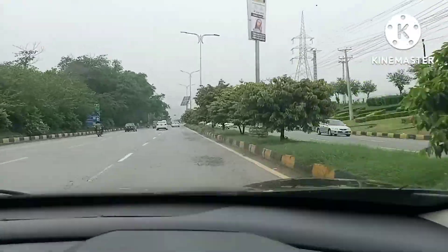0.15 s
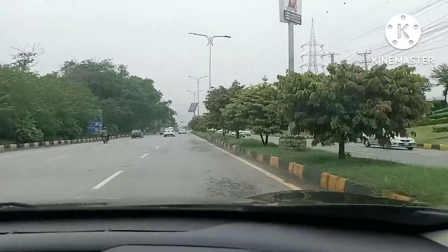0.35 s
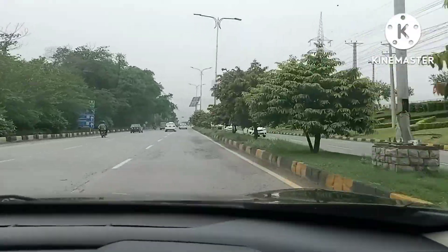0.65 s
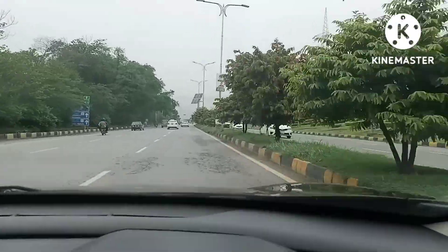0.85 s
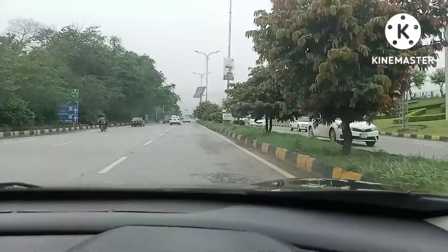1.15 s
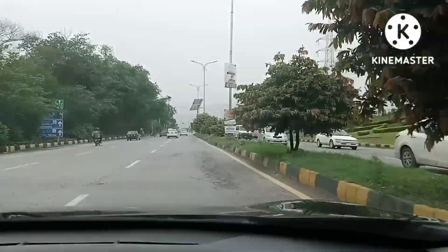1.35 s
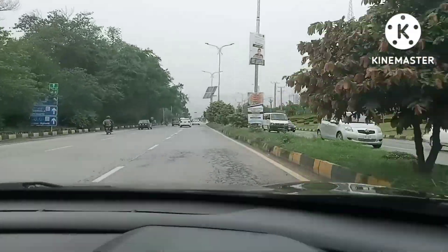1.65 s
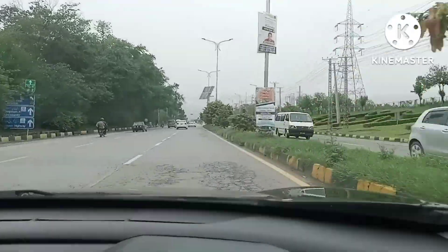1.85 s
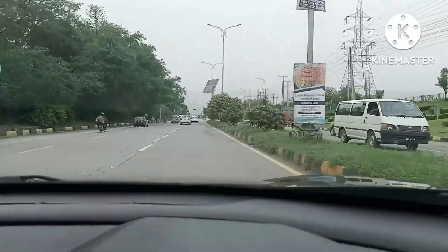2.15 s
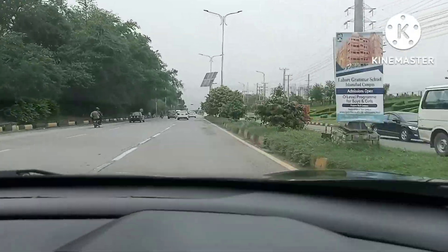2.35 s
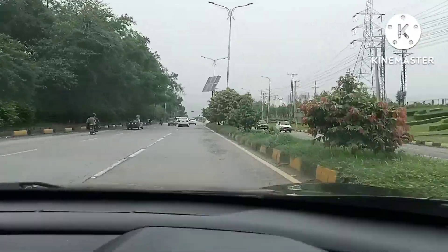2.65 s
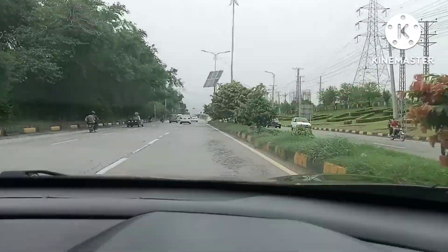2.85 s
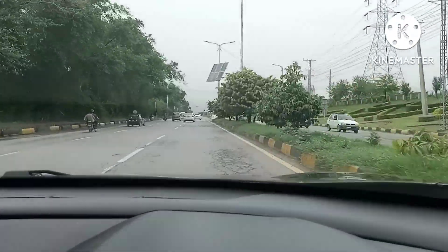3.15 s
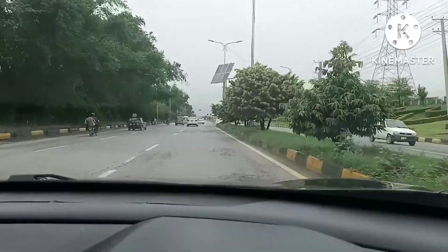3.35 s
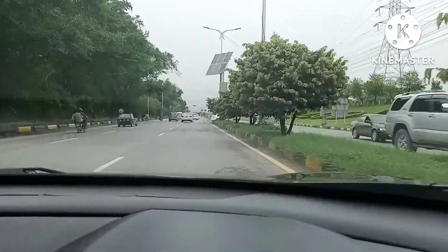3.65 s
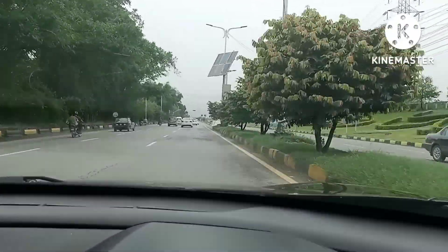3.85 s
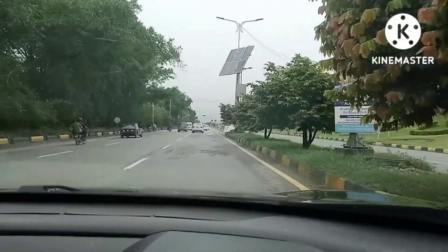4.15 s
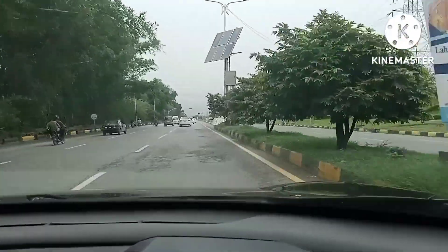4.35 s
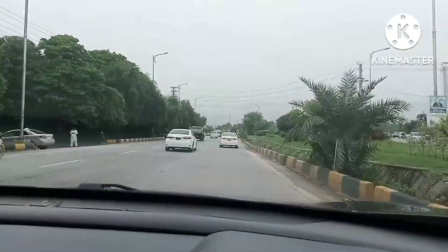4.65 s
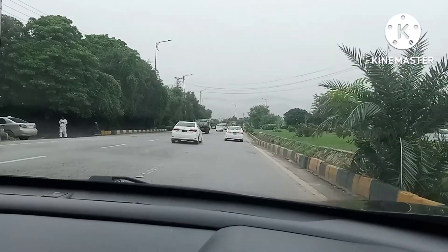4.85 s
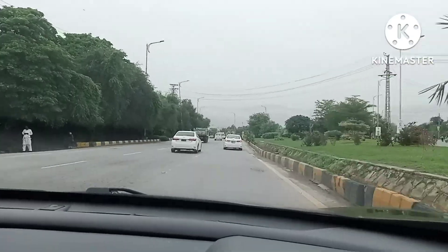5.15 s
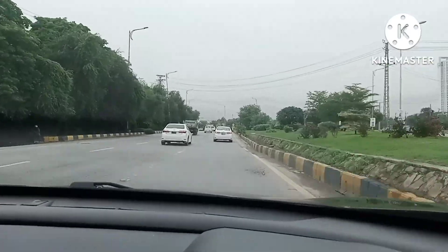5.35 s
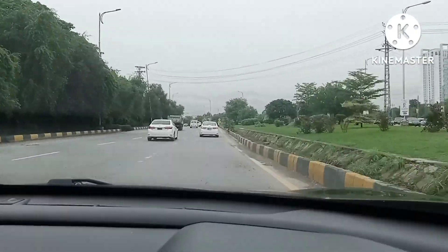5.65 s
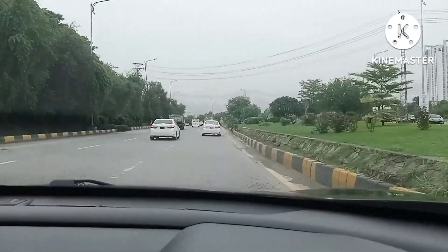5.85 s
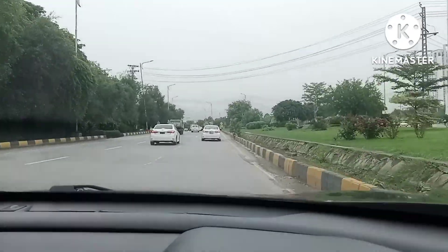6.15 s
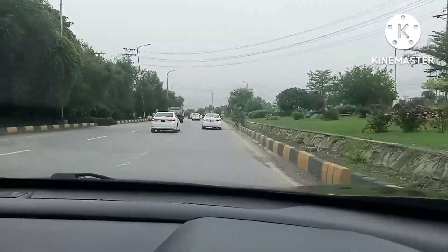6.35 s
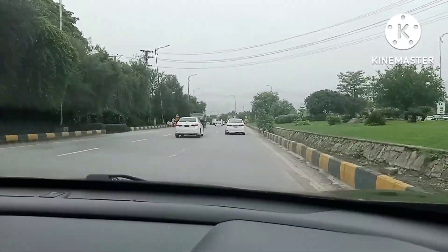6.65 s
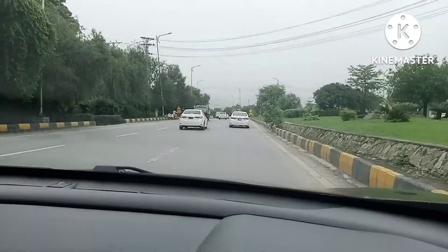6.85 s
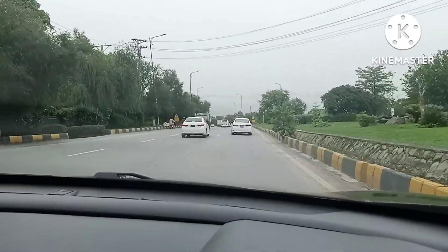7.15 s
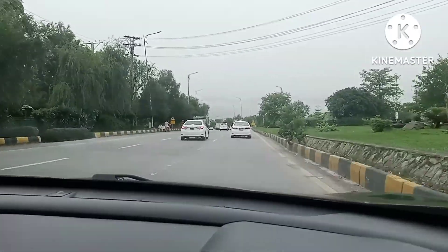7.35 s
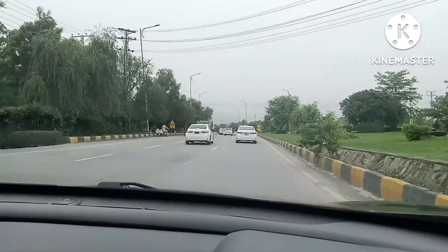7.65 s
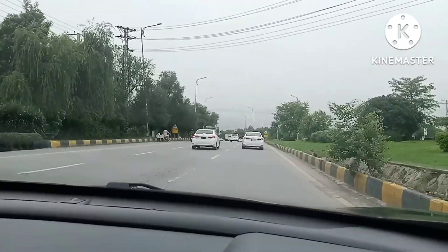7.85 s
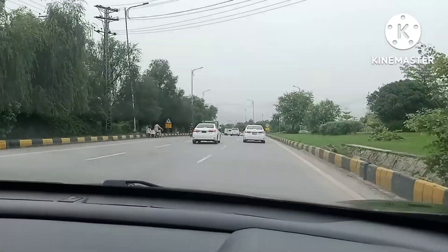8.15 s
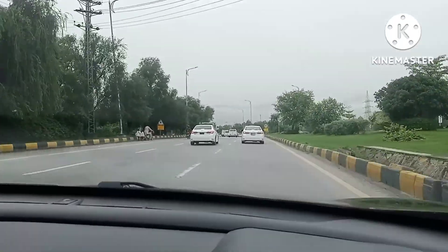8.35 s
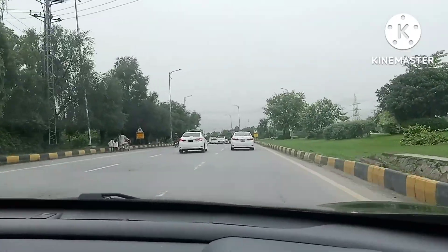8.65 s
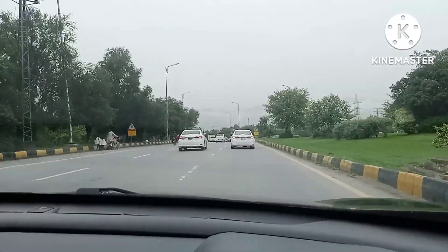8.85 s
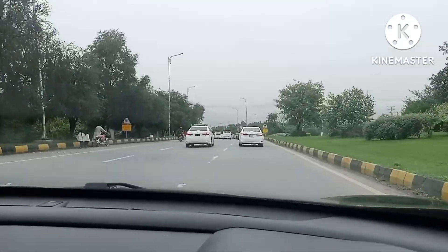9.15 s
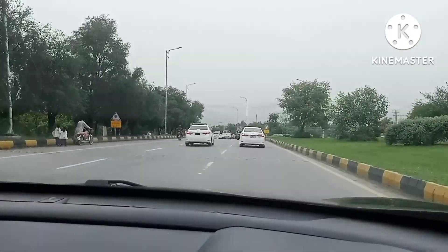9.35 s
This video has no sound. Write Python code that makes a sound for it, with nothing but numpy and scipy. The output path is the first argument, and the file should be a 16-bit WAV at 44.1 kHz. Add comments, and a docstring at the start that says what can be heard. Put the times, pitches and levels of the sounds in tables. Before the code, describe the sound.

Heavy booming cabin rumble on damp tarmac drops out suddenly midway, then swells back softer and steadier, with small clicks and a quiet knock.

```python
"""Inside a closed car

A drive on damp tarmac, heard by a hand-held phone: two stretches of road, with a fade, a cut and near silence between.
Shaken resonances make a low boom, and shaped noise makes the tyre roar and the hiss. Tiny contacts make loose trim buzz,
and sharp clicks, short blows and narrow noise make ticks, a knock and squeaks. A faint steady whine lies above."""
import sys
import numpy as np
from scipy import signal
from scipy.fft import rfft, irfft
from scipy.io import wavfile
from scipy.ndimage import uniform_filter1d

SR = 44100
rng = np.random.default_rng(int(sys.argv[2]) if len(sys.argv) > 2 else 0)


def pcm_store(signal):
    """Save signal as 16-bit PCM."""
    levels = np.round(np.clip(np.atleast_2d(signal), -1, 1) * 32767)
    wavfile.write(sys.argv[1], SR, levels.astype(np.int16).T)


N = 419832  # length in samples

# How hard the road shakes the car. Each row: time in seconds, boom level in dB.
ROAD_SHAKE = [(0.1, -31), (0.5, -29), (0.7, -29.5), (0.93, -24), (1.2, -32.5), (1.45, -23), (1.62, -20.5),
              (1.87, -28.5), (2.1, -21.5), (2.33, -20), (2.6, -25), (2.9, -30), (3.35, -28), (3.62, -24),
              (3.9, -25), (4.25, -26.5), (4.45, -27), (5.0, -31.5), (5.28, -32), (5.47, -30.5),
              (5.75, -32.5), (6.15, -28.5), (6.35, -30), (6.55, -30), (6.9, -33.5), (7.3, -31),
              (7.6, -32.5), (8.0, -34), (8.32, -29), (8.65, -34.5), (9.05, -33.5), (9.3, -33.5),
              (9.5, -33.5)]
# Body, cabin and tyre-cavity resonances, one table per stretch.
# Each row: pitch in Hz, width in Hz, average (rms) level in dB at the usual shake or upper level.
BODY_MODES = [
    [(52.3, 28, -50), (73.4, 7.6, -39.5), (84.8, 25, -38.5), (124.6, 27, -37), (169.9, 20, -37.5),
     (197.4, 24, -40.5), (237.5, 11, -44.5), (255.5, 17, -52), (303.4, 36, -43), (358, 47, -51)],
    [(30, 30, -59), (52, 15, -48.5), (76.6, 14, -40), (95, 25, -37), (128.2, 25, -34), (171.3, 21, -36.5),
     (205.4, 24, -44.5), (234.3, 26.4, -41), (308.5, 22.1, -41.5), (401, 110, -50)],
]
# Level of the upper boom resonances, one table per stretch. Each row: time in seconds, level in dB.
UPPER_BOOM = [
    [(0.2, -36), (0.55, -33.5), (1.24, -33.5), (1.58, -30.5), (1.93, -33.5), (2.27, -30.5), (2.62, -33),
     (3.31, -34.5), (3.66, -30), (3.85, -31.5), (4.1, -30.5), (4.4, -33)],
    [(5.0, -37), (6.6, -37), (7.4, -38), (7.8, -36), (8.2, -38.5), (8.6, -39.5), (9.0, -38), (9.4, -37.5)],
]
# Colour of the tyre roar after the panels, one table per stretch. Each row: pitch in Hz, relative dB per Hz.
ROAR_COLOUR = [
    [(300, -7), (400, -1.5), (570, -6.5), (750, -11.5), (900, -10.5), (1670, -13.5), (1900, -14),
     (2700, -27), (3000, -34), (3400, -43), (4600, -55.5)],
    [(300, -15.5), (400, 2.5), (540, -2), (650, -4.5), (730, -10.5), (860, -6.5), (1440, -11), (1900, -10),
     (2250, -16), (2960, -34.5), (4600, -47.5)],
]
# Door, floor and glass panels that shape the roar. Each row: pitch in Hz, width in Hz, lift in dB.
PANEL_LIFTS = [(567, 20, -1), (632, 40, 4), (811.6, 22, 4.5), (891.4, 13, 7), (1082, 79, 3), (1254, 13, 6),
               (1374, 16, 5.5), (1540, 22, 6), (1840, 31, 4), (3100, 40, 3)]
# Level of the roar's top edge, one table per stretch. Each row: time in seconds, level in dB.
ROAR_EDGE = [
    [(0.2, -64.5), (0.89, -72), (1.24, -64), (1.58, -74.5), (1.93, -67), (2.27, -76.5), (2.62, -66.5),
     (2.97, -64), (3.5, -70), (4.0, -66), (4.3, -65.5), (4.45, -67), (4.52, -56), (4.58, -58.5)],
    [(4.76, -68), (4.86, -75), (4.95, -75), (5.4, -71.5), (5.8, -75.5), (6.2, -76.5), (7.0, -73.5),
     (7.4, -75), (7.8, -71), (8.2, -75), (8.6, -75), (9.4, -75)],
]
# Colour of the microphone hiss. Each row: pitch in Hz, relative dB per Hz.
HISS_COLOUR = [(3500, -1), (4300, 0.5), (5500, 2), (6900, 1), (7500, -5), (8200, -11.5), (11000, -13.5),
               (14100, -14.5), (14300, -5.5), (15400, -3), (15700, -25.5), (16700, -26.5)]
# Resonances of the phone case and microphone port. Each row: pitch in Hz, width in Hz, strength in dB.
CASE_MODES = [(6700, 1200, -1.5), (10600, 4500, -17), (5100, 2200, -12.5)]
# Ticks on the case and the trim. Each row: start in seconds, peak in dB, pitch of its own ring in Hz,
# ring strength in dB, dull body strength in dB, bright top strength in dB.
TICK_EVENTS = [(0.0712, -23.5, 6840, 2, -24, -18), (.107, -59, 14500, -2, -8, -6),
               (.161, -71, 10500, 9, -21, -18), (.328, -68, 9000, 0, -21, -15),
               (2.798, -77, 14100, 7, -18, -5), (3.669, -61, 7830, 0, -21, -15),
               (4.465, -56, 6200, 0, -25, -4), (4.4707, -35, 5960, -3.5, -17, -7),
               (4.498, -26.5, 5800, 2, -37, -2), (4.5196, -44, 6500, -2, -30, -9),
               (4.805, -39.5, 7500, -3, -21, -3), (5.862, -66, 4700, 5, -3, -15),
               (5.866, -68, 7600, 6, -8, -15), (6.113, -64, 9300, -1, -2, -15),
               (6.118, -58, 7300, 1, -6, -15), (6.603, -57, 8260, -1, 0, -15),
               (6.620, -64, 7300, 4, -19, -15), (7.292, -56, 7100, 2, 0, -12),
               (7.294, -61, 10200, 4, -20, -11), (7.726, -57, 9200, 6, -3, -15),
               (7.859, -73, 8200, 2, -1, -5), (8.115, -68, 6300, -4, -2, -15),
               (8.691, -62, 8100, 9, -3, -8), (8.829, -62, 8500, 1, 1, -15), (8.831, -68, 6100, 6, -9, -15)]
# Short squeaks, likely trim rubbing. Each row: middle in seconds, half length in seconds, pitch in Hz,
# level in dB before the swell and fade.
SQUEAK_EVENTS = [(0.33, 0.032, 6240, -69.5), (0.84, 0.029, 6040, -83), (2.45, 0.046, 6700, -72),
                 (3.065, 0.19, 3610, -78.5), (4.555, .02, 6940, -74), (4.73, 0.016, 1800, -47),
                 (5.378, .025, 3870, -71), (6.09, .02, 6350, -80), (5.878, .02, 4320, -79),
                 (6.206, .04, 3700, -78), (6.74, .025, 3150, -79), (6.73, .04, 7000, -87),
                 (9.045, .05, 5350, -86), (9.084, 0.042, 6850, -79), (9.161, 0.046, 6800, -77)]
# A double knock and a fainter third blow. Each row: start in seconds, peak in dB.
KNOCK_BLOWS = [(6.664, -34), (6.670, -34), (6.678, -53)]
# Resonances of the dashboard. Each row: pitch in Hz, width in Hz, strength in dB.
DASH_MODES = [(1830, 280, 3.5), (1190, 500, -4), (2700, 290, -14), (3230, 210, -19), (4600, 610, -27),
              (5800, 1300, -31)]
# Level of the trim's buzz. Each row: time in seconds, level in dB.
BUZZ_LEVEL = [(0.2, -85), (0.55, -91.5), (0.9, -90), (1.58, -81.5), (1.93, -88), (2.3, -82.5),
              (2.62, -83.5), (2.97, -88), (4.0, -86.5), (4.35, -90.5), (4.48, -84), (4.55, -86.5),
              (4.82, -91), (5.4, -92), (5.8, -99.5), (6.2, -93), (7.1, -90.5), (7.4, -87.5), (7.8, -99),
              (8.6, -99), (9.4, -99)]

CHANGE_S = 4.65  # the second stretch's settings start here
USUAL_SHAKE_DB = -30
UPPER_FROM_HZ, USUAL_UPPER_DB = 150, (-34, -36)  # usual level per stretch
ROAR_DB, ROAR_PER_SHAKE = (-43.5, -45.5), 0.2  # level at usual shake per stretch; dB of roar per dB of shake
EASE_FROM_S, EASE_DB_PER_S = 9.1, 0.7  # the roar sinks a little towards the end
EDGE_HZ, USUAL_EDGE_DB = 2400, (-67.5, -72.5)  # usual level per stretch
HISS_DB, HISS_PATCH_DB = -84, 1.6
WHINE_HZ, WHINE_DB = 14300, -96  # peak level on the first stretch
SQUEAK_WIDTH, SQUEAK_WAVERS = 0.06, 10  # share of the pitch; wavers in a half length, so long squeaks are purer
RING_HZ, FAINT_RING_HZ, FAINT_BELOW_DB = 1110, 450, -52  # ring widths; faint ticks on the trim ring longer
TICK_BODY_HZ, TICK_BODY_WIDTH_HZ = 4200, 2200
TICK_TOP_HZ, TICK_TOP_WIDTH_HZ = 14700, 940
TICK_TAIL_S, TAIL_S_PER_DB = 0.06, 0.001  # time to fall 60 dB for a -31 dB tick; fainter ticks die sooner
TAIL_DB = -46  # tail strength of a -14.5 dB tick, before the resonances
FADE_OUT_S, FADE_OUT_LENGTH_S, FADE_OUT_POWER = 4.491, 0.17, 2.1  # cut off before it is through
CUT_S, AFTER_CUT_DB, AFTER_CUT_DB_PER_S = 4.5905, -30, 700  # the boom drops at the cut, then dies away
FADE_IN_S, FADE_IN_LENGTH_S, FADE_POWER = 4.672, 0.27, 2.2
TOP_HZ = 16700


def undb(db):
    """Turn dB into a plain multiplier."""
    return 10 ** (np.asarray(db) / 20)


def level(x, db):
    """Scale a sound to an average (rms) level in dB."""
    return x * undb(db) / np.sqrt(np.mean(x ** 2))


def curve(rows, column):
    """Draw a table column as straight lines in time, one value per sample."""
    rows = np.array(rows)
    return np.interp(np.arange(N) / SR, rows[:, 0], rows[:, column])


def walk(rate):
    """Wander at random: held values, new at this rate per second, smoothed twice; spread near 1."""
    hold = int(SR / rate)
    steps = np.repeat(rng.standard_normal(N // hold + 1), hold)
    smooth = uniform_filter1d(uniform_filter1d(steps, hold), hold)
    return 1.3 * smooth[:N]


def mode(x, hz, width_hz):
    """Ring one resonance, which passes its centre pitch unchanged and weakens the rest."""
    return signal.lfilter(*signal.iirpeak(hz, hz / width_hz, fs=SR), x)


def ring_through(x, modes):
    """Ring several resonances at once: their powers add, and the response never starts before its cause."""
    hz = np.arange(513) * SR / 1024
    power = sum((undb(db) / (1 + (2 * (hz - centre) / width) ** 2)) ** 2 for centre, width, db in modes)
    # folding the cepstrum moves all of the response after its cause
    cepstrum = irfft(0.5 * np.log(power))
    cepstrum[1:512] *= 2
    cepstrum[513:] = 0
    response = irfft(np.exp(rfft(cepstrum)))
    return signal.fftconvolve(x, response)[:len(x)]


def bands(spectrum, lifts, shared_db, own_db, patch_hz, patch_s):
    """Colour noise; narrow patches of it swell and fade on their own, most of all near 3 kHz."""
    hz, s, cells = signal.stft(rng.standard_normal(N + SR // 5), SR, nperseg=2048, noverlap=1536)
    points = np.array(spectrum)
    colour_db = np.interp(np.log(hz + 1), np.log(points[:, 0]), points[:, 1], -200, -200)
    colour_db += sum(db / (1 + (2 * (hz - centre) / width) ** 2) for centre, width, db in lifts)
    # random numbers smoothed over pitch and time make the patches
    patches = rng.standard_normal(cells.shape)
    for _ in range(2):
        patches = uniform_filter1d(patches, max(int(patch_hz / hz[1]), 1), axis=0)
        patches = uniform_filter1d(patches, max(int(patch_s / s[1]), 1), axis=1)
    depth_db = own_db * np.clip(hz / 2500, 0.3, 1.2) * np.clip(1 - (hz - 3300) / 2000, 0.6, 1)
    patches_db = depth_db[:, None] * patches / patches.std()
    cells = cells * undb(colour_db[:, None] + patches_db)
    noise = signal.istft(cells, SR, nperseg=2048, noverlap=1536)[1]
    noise = noise[SR // 10:SR // 10 + N]
    return level(noise * undb(shared_db), 0)


def microphone_hiss():
    """Coloured noise of the microphone, with small random swells."""
    return bands(HISS_COLOUR, [], 0.67 * walk(22), HISS_PATCH_DB, 300, 0.03) * undb(HISS_DB)


def whine(t, first):
    """Faint electronics hold one pure tone, weaker on the second stretch."""
    whine_db = WHINE_DB - 8 * ~first
    return undb(whine_db) * np.sin(2 * np.pi * WHINE_HZ * t)


def squeaks():
    """A narrow band of noise swells and fades at one pitch, likely trim rubbing."""
    out = np.zeros(N)
    for middle_s, half_s, hz, db in SQUEAK_EVENTS:
        width = min(SQUEAK_WIDTH * hz, SQUEAK_WAVERS / half_s)
        n = int(half_s * 2 * SR)
        thin = mode(mode(rng.standard_normal(n), hz, width), hz, width)
        start = int((middle_s - half_s) * SR)
        out[start:start + n] += level(thin, db) * np.hanning(n)
    return out


def knocks():
    """Short rough blows ring the resonances of the dashboard."""
    out, t = np.zeros(N), np.arange(SR // 10) / SR
    for s, db in KNOCK_BLOWS:
        blow = 1.6 * (t == 0) + rng.standard_normal(len(t)) * np.exp(-t / 0.0051)
        rung = 0
        for hz, width, strength_db in DASH_MODES:
            narrow = mode(blow, hz, width)
            steep = mode(mode(narrow, hz, 2 * width), hz, 2 * width)
            rung = rung + undb(strength_db) * steep
        start = int(s * SR)
        out[start:start + len(t)] += rung * undb(db) / np.max(np.abs(rung))
    return out


def ticks():
    """A sharp click rings the phone case and a ring, body and top of its own, with a soft noisy tail."""
    out, t = np.zeros(N + SR), np.arange(SR // 5) / SR
    for s, db, hz, ring_db, body_db, top_db in TICK_EVENTS:
        noise = rng.standard_normal(len(t))
        click = (t == 0) + 0.15 * noise * np.exp(-t / 0.00065)
        tail_s = max(TICK_TAIL_S + TAIL_S_PER_DB * (db + 31), 0.005)
        # faint ticks come from further off and are more tail than click
        tail_db = TAIL_DB - 0.42 * (db + 14.5)
        tail = undb(tail_db) * noise * np.exp(-np.log(1000) * t / tail_s)
        ring_width = RING_HZ if db > FAINT_BELOW_DB else FAINT_RING_HZ
        own_modes = [(hz, ring_width, ring_db),
                     (TICK_BODY_HZ, TICK_BODY_WIDTH_HZ, body_db),
                     (TICK_TOP_HZ, TICK_TOP_WIDTH_HZ, top_db)]
        rung = ring_through(click + 0.36 * tail, CASE_MODES + own_modes)
        # the port's main resonance carries the soft tail
        port_tail = mode(mode(tail, 6400, 2600), 6400, 2600)
        tick = rung + port_tail
        start = int(s * SR)
        out[start:start + len(t)] += tick * undb(db) / np.max(np.abs(tick))
    return out[:N]


def trim_buzz():
    """Loose trim chatters in tiny uneven contacts, about 1200 a second, which ring the phone case."""
    happens = rng.random(N) < 1200 / SR
    size_db = np.minimum(-3 * np.log(1 - rng.random(N)), 11)
    sign = np.sign(rng.standard_normal(N))
    contacts = happens * undb(size_db + 2.5 * walk(12)) * sign
    rung = mode(ring_through(contacts, CASE_MODES), 6200, 2000)
    return level(rung, 0) * undb(curve(BUZZ_LEVEL, column=1))


def thin_top(roar, edge_db):
    """The top edge of the roar swells and thins."""
    high_pass = signal.butter(2, EDGE_HZ, "high", fs=SR, output="sos")
    top = signal.sosfiltfilt(high_pass, roar, padlen=SR // 20)
    return roar + (undb(edge_db) - 1) * top


def tyre_roar(t, first, shake_db):
    """Tyre noise comes through the panels, a little louder when the road shakes the car harder."""
    ease_db = EASE_DB_PER_S * np.maximum(t - EASE_FROM_S, 0)
    roar_db = np.where(first, *ROAR_DB) + ROAR_PER_SHAKE * (shake_db - USUAL_SHAKE_DB) - ease_db
    surface_db = 0.18 * walk(7.6)  # the surface changes under all tyres at once
    stretches = [bands(colour, PANEL_LIFTS, surface_db, 3.18, 130, 0.04) for colour in ROAR_COLOUR]
    roar = np.where(first, *stretches) * undb(roar_db)
    edges_db = [curve(rows, column=1) - usual_db for rows, usual_db in zip(ROAR_EDGE, USUAL_EDGE_DB)]
    return thin_top(roar, np.where(first, *edges_db))


def boom(modes, shake_db, upper_db):
    """Road texture shakes every resonance unevenly; the low ones follow the shake, the upper their own level."""
    shake = rng.standard_normal(N) * undb(0.2 * walk(16))
    rung = 0
    for k, (hz, width, db) in enumerate(modes):
        share = np.clip(1.3 - abs(hz - 95) / 250, 0.2, 1.15)
        follow_db = share * (shake_db - USUAL_SHAKE_DB) if hz < UPPER_FROM_HZ else upper_db
        swell_db = follow_db + 0.71 * walk(4)
        # two passes narrow a resonance, so each pass is made wider
        ring = mode(mode(shake, hz, 1.66 * width), hz, 1.66 * width)
        # neighbours take opposite signs
        rung = rung + (-1) ** k * undb(swell_db) * level(ring, db)
    # the boom is kept below about 700 Hz
    return signal.sosfilt(signal.butter(3, 700, fs=SR, output="sos"), rung)


def road_boom(first, shake_db):
    """Each stretch booms through its own set of body and cabin resonances."""
    stretches = []
    for modes, rows, usual_db in zip(BODY_MODES, UPPER_BOOM, USUAL_UPPER_DB):
        stretches.append(boom(modes, shake_db, curve(rows, column=1) - usual_db))
    return np.where(first, *stretches)


def join_gains(t):
    """Gains of the boom and of the rest: fade out, cut, fade in; only the boom dies away after the cut."""
    out = np.clip(1 - (t - FADE_OUT_S) / FADE_OUT_LENGTH_S, 0, 1) ** FADE_OUT_POWER
    rise = np.clip((t - FADE_IN_S) / FADE_IN_LENGTH_S, 0, 1)
    back = np.sin(np.pi / 2 * rise) ** FADE_POWER
    late = np.maximum(t - CUT_S, 0)
    dying = out * undb(AFTER_CUT_DB - AFTER_CUT_DB_PER_S * late)
    boom_gain = np.where(late > 0, back + dying, out)
    rest_gain = np.where(late > 0, back, out)
    return boom_gain, rest_gain


def scene():
    """Add up the layers; the fades and the cut leave the ticks alone."""
    t = np.arange(N) / SR
    first = t < CHANGE_S
    shake_db = curve(ROAD_SHAKE, column=1)
    background = microphone_hiss() + whine(t, first)
    trim = squeaks() + knocks() + trim_buzz()
    rest = background + trim + tyre_roar(t, first, shake_db)
    low = road_boom(first, shake_db)
    boom_gain, rest_gain = join_gains(t)
    return (low * boom_gain + rest * rest_gain + ticks())[None]


def record(dry):
    """The phone cuts off the highest pitches with a steep low-pass."""
    return signal.sosfilt(signal.ellip(8, 0.2, 70, TOP_HZ, fs=SR, output="sos"), dry)


dry = scene()
out = record(dry)
pcm_store(out)
```